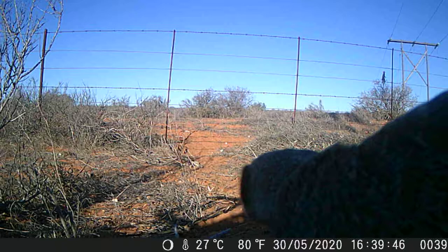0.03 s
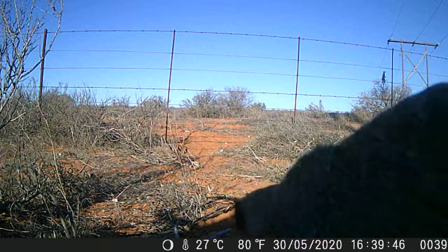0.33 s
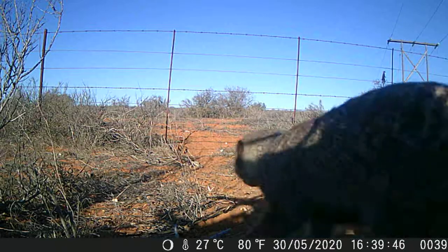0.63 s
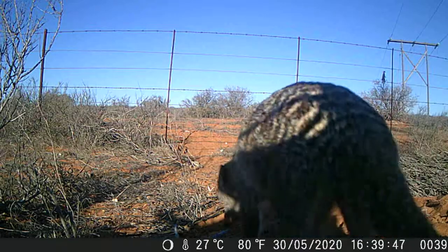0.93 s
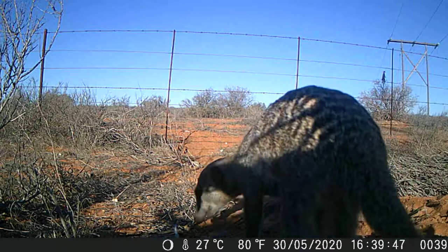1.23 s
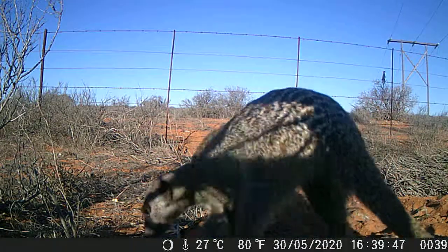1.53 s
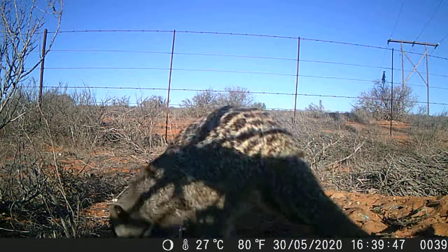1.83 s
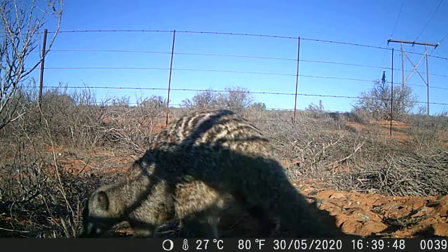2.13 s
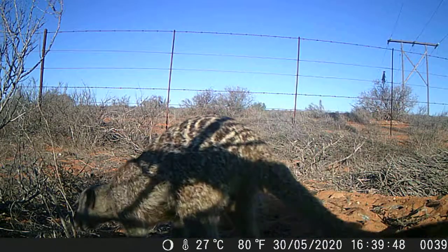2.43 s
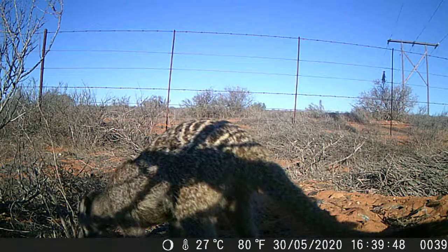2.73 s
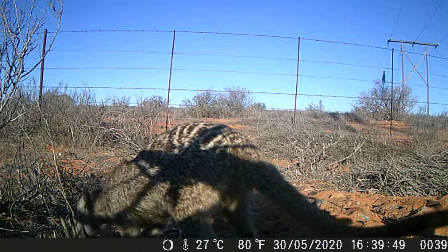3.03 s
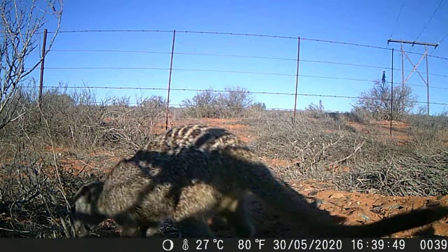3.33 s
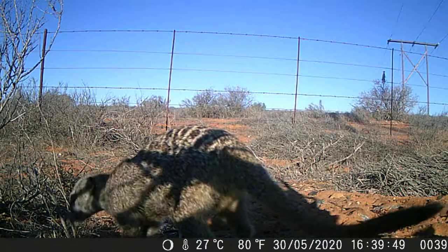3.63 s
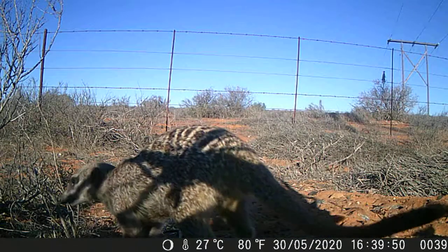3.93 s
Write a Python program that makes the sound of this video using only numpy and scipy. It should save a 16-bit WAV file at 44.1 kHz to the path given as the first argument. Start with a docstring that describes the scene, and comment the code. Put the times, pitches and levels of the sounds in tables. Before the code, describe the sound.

A single click, then a faint steady hiss of still outdoor air.

```python
"""One click as a trail camera's microphone switches on: a voltage step that drains away.
Faint air and circuit hiss follow in still, open scrubland, swelling slightly five times a second.
A thin high sizzle brightens the second half; the electronics give four tiny whines near the end.
Behind these lie a few faint scuffs and a low, wavering hum."""
import sys
import numpy as np
from scipy import signal
from scipy.fft import rfft, irfft
from scipy.io import wavfile
from scipy.ndimage import uniform_filter1d

SR = 44100
rng = np.random.default_rng(int(sys.argv[2]) if len(sys.argv) > 2 else 0)


def log_audio(samples):
    """Write samples as a 16-bit WAV file to the path given in sys.argv[1]."""
    # one column per channel
    frames = np.atleast_2d(samples).T
    # limit to full scale, then quantise
    limited = np.clip(frames, -1, 1)
    pcm = np.round(limited * 32767).astype(np.int16)
    wavfile.write(sys.argv[1], SR, pcm)


N = 176400

SWITCH_ON_S, STEP_DB, DRAIN_TAU_S = .0726, -10, .12
# Click filter: f/Hz, gain/dB
CLICK_RESPONSE = [(100, 0.5), (700, 0.1), (1900, -1), (2800, -3.5), (3700, -7), (5100, -12), (6100, -9.5),
                  (7350, -5.5), (8100, -5.5), (9800, -16.5), (12500, -23), (15800, -35)]


def switch_click(t):
    """The microphone's supply jumps on and drains away through its coupling capacitor."""
    elapsed_s = np.maximum(t - SWITCH_ON_S, 0)
    step = (t >= SWITCH_ON_S) * np.exp(-elapsed_s / DRAIN_TAU_S)
    return undb(STEP_DB) * colour(step, CLICK_RESPONSE)


HISS_GAIN_DB, FLICKER_DB, FLICKER_HZ = .5, .5, 14
SWELL_GAIN_DB, SWELL_FIRST_S, SWELL_PERIOD_S, SWELL_SIGMA_S = -1.5, .091, .201, .025
# Steady hiss, before gain: f/Hz, density/(dB per Hz)
HISS_SPECTRUM = [(15, -78), (50, -80), (80, -85.5), (150, -89.5), (300, -94.5), (650, -99.2),
                 (1100, -103.5), (2000, -108.3), (2700, -111), (3600, -116.3), (5200, -124.5),
                 (6200, -123.5), (6450, -120), (6850, -122), (7300, -120), (8050, -123), (8450, -135),
                 (9000, -155)]
# Swelling hiss, before gain: f/Hz, density/(dB per Hz)
SWELL_SPECTRUM = [(100, -112), (700, -99), (1500, -108), (2450, -108), (3300, -122), (5500, -132),
                  (7300, -117), (8100, -123), (9000, -160)]


def hiss(t):
    """Dark air and circuit hiss; one part flickers slightly, another swells at a regular pace."""
    steady = undb(HISS_GAIN_DB + FLICKER_DB * walk(FLICKER_HZ)) * noise(HISS_SPECTRUM)
    from_peak_s = (t - SWELL_FIRST_S + SWELL_PERIOD_S / 2) % SWELL_PERIOD_S - SWELL_PERIOD_S / 2
    swell = np.exp(-.5 * (from_peak_s / SWELL_SIGMA_S) ** 2)
    return steady + undb(SWELL_GAIN_DB) * swell * noise(SWELL_SPECTRUM)


# Sizzle at 0 dB gain: f/Hz, density/(dB per Hz)
SIZZLE_SPECTRUM = [(500, -118), (1300, -112), (1800, -118), (2400, -112), (3200, -125), (6000, -135),
                   (7030, -119), (7190, -109), (7350, -110.5), (7520, -118), (8050, -118), (8450, -133),
                   (8680, -130), (9000, -155)]
# Sizzle envelope: t/s, gain/dB
SIZZLE_ENVELOPE = [(2.27, -25), (2.305, -1.5), (2.40, .5), (2.445, -25), (2.49, 0), (2.97, -.5), (3.02, -3),
                   (3.07, -.5), (3.5, -4), (3.62, -7), (3.73, -7), (3.83, -23), (3.91, -15), (4.0, -18)]


def sizzle(t):
    """Thin hiss, peaking near 7.2 kHz, that rises just past halfway and falters."""
    times_s, gains_db = np.array(SIZZLE_ENVELOPE).T
    return undb(np.interp(t, times_s, gains_db)) * noise(SIZZLE_SPECTRUM)


WHINE_F0_HZ, WHINE_RAMP_S = 820.5, .006
# Whine partials: harmonic number, relative level/dB
WHINE_HARMONICS = [(3, 0), (5, -11), (7, -14), (8, -11), (9, -11)]
# Whines: start/s, length/s, level/dB
WHINE_EVENTS = [(3.635, .04, -79), (3.704, 0.044, -74.5), (3.891, 0.055, -75), (3.95, .028, -82)]


def whines(t):
    """Short buzzy tones from the camera's circuits."""
    tone = sum(undb(db) * np.sin(2 * np.pi * (harmonic * WHINE_F0_HZ * t + rng.random()))
               for harmonic, db in WHINE_HARMONICS)
    gate = np.zeros(N)
    for start_s, length_s, level_db in WHINE_EVENTS:
        to_edge_s = np.minimum(t - start_s, start_s + length_s - t)
        gate += undb(level_db) * np.clip(to_edge_s / WHINE_RAMP_S, 0, 1)
    return gate * tone


# Scuffs: peak time/s, length/s, centre/Hz, bandwidth/Hz, level/dB
SCUFF_EVENTS = [(2.105, .03, 1600, 1300, -76), (2.37, .03, 2220, 110, -78), (3.25, 0.063, 2450, 110, -75),
                (3.245, 0.054, 2100, 200, -78)]


def scuffs(t):
    """Brief narrow rasps, perhaps an animal moving in dry twigs."""
    out = np.zeros(N)
    for peak_s, length_s, centre_hz, width_hz, level_db in SCUFF_EVENTS:
        edges_hz = [centre_hz - width_hz / 2, centre_hz + width_hz / 2]
        bandpass = signal.butter(2, edges_hz, "band", fs=SR, output="sos")
        rasp = signal.sosfilt(bandpass, rng.standard_normal(N))
        envelope = np.exp(-(2 * (t - peak_s) / length_s) ** 2)
        out += undb(level_db) * envelope * rasp / rasp.std()
    return out


HUM_HZ, HUM_DB, WAVER_DB, WAVER_HZ = 50.7, -65.5, 2, 2.8


def hum(t):
    """A faint low hum that wavers in level."""
    return undb(HUM_DB + WAVER_DB * walk(WAVER_HZ)) * np.sin(2 * np.pi * HUM_HZ * t)


def undb(db):
    """Decibels to gain."""
    return 10 ** (np.asarray(db) / 20)


def curve_db(points, hz):
    """Read (Hz, dB) points along a log-frequency axis."""
    f, db = np.array(points, float).T
    return np.interp(np.log(np.maximum(hz, 1)), np.log(f), db)


def noise(points):
    """Noise with the given density in dB per Hz."""
    hz = np.arange(N // 2 + 1) * SR / N
    return irfft(rfft(rng.standard_normal(N)) * undb(curve_db(points, hz)) * np.sqrt(SR / 2), N)


def colour(x, points, size=2048):
    """Causal filter with the given (Hz, dB) response."""
    hz = np.arange(size // 2 + 1) * SR / size
    cepstrum = irfft(np.log(undb(curve_db(points, hz))))
    fold = np.r_[1, np.full(size // 2 - 1, 2), 1, np.zeros(size // 2 - 1)]
    return signal.fftconvolve(x, irfft(np.exp(rfft(cepstrum * fold))))[:N]


def walk(rate):
    """Slow random drift with a spread of 1."""
    k = int(SR / rate)
    w = uniform_filter1d(uniform_filter1d(np.repeat(rng.standard_normal(N // k + 1), k), k), k)[:N]
    return w / w.std()


def scene():
    """Silence until switch-on, then the click over the hiss and a few tiny sounds; mono."""
    t = np.arange(N) / SR
    background = hiss(t) + sizzle(t) + whines(t) + scuffs(t) + hum(t)
    return (switch_click(t) + (t >= SWITCH_ON_S) * background)[None]


NOTCH_MIX, LOWPASS_HZ = .76, 15800
# Dips in the microphone's response: f/Hz, width/Hz
MIC_NOTCHES = [(3215, 296), (6450, 260)]


def record(dry):
    """The microphone has two narrow dips and a steep treble cut."""
    out = dry
    for centre_hz, width_hz in MIC_NOTCHES:
        notch = signal.iirnotch(centre_hz, centre_hz / width_hz, fs=SR)
        out = (1 - NOTCH_MIX) * out + NOTCH_MIX * signal.lfilter(*notch, out)
    lowpass = signal.ellip(8, .1, 70, LOWPASS_HZ, fs=SR, output="sos")
    return signal.sosfilt(lowpass, out)


dry = scene()
out = record(dry)
log_audio(out)
```